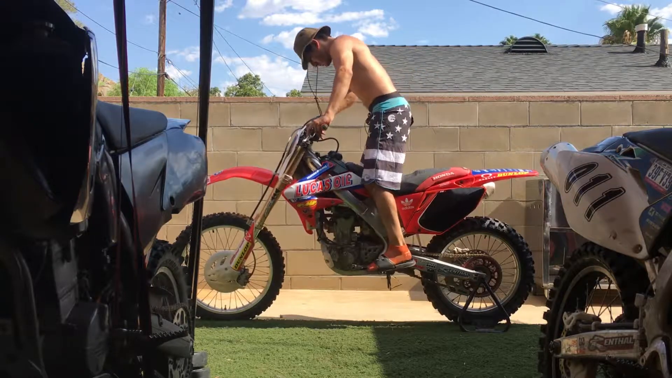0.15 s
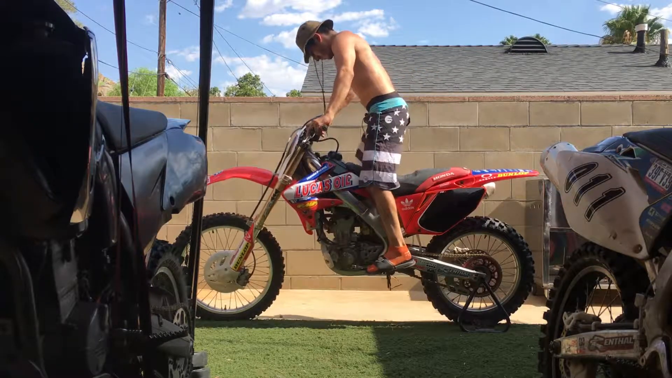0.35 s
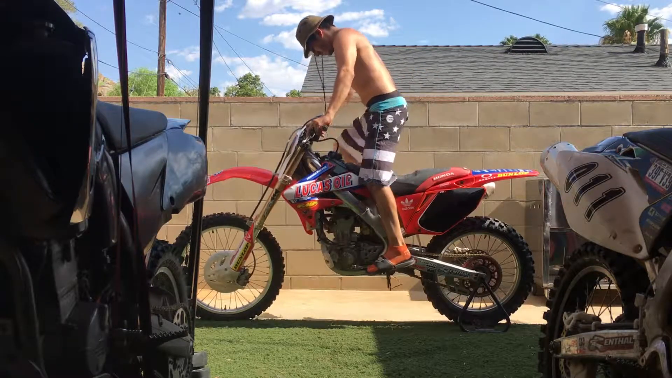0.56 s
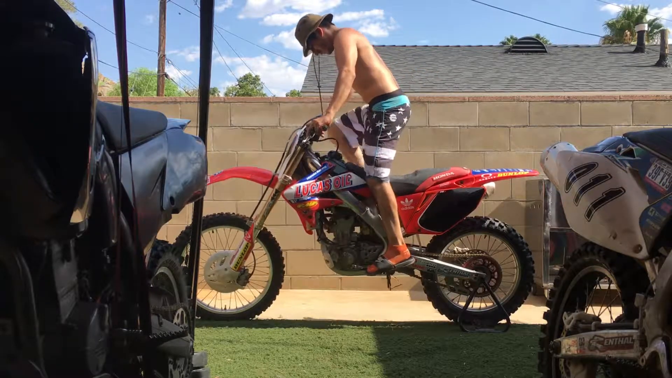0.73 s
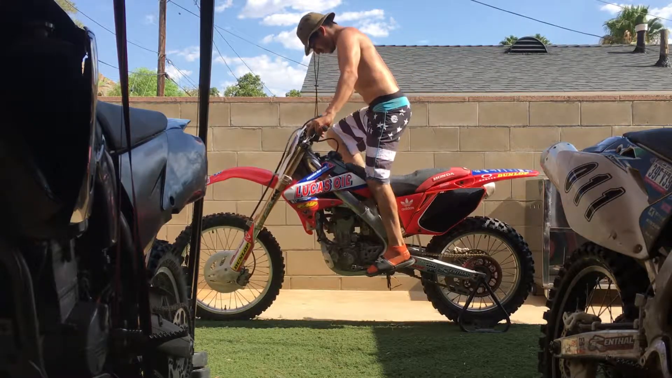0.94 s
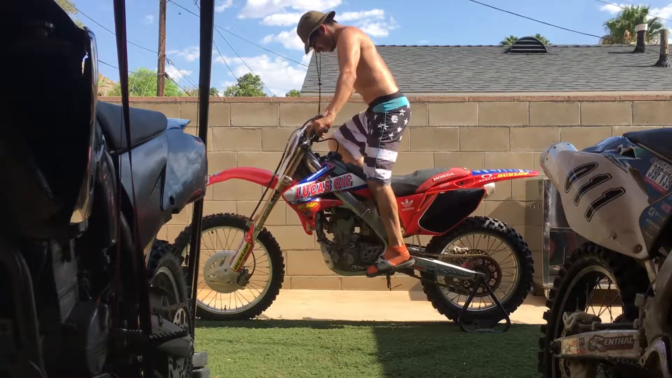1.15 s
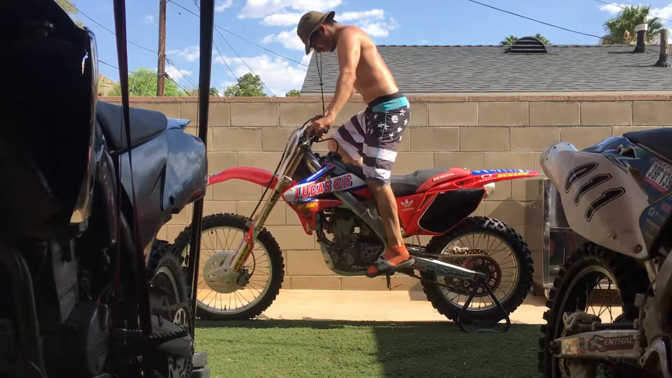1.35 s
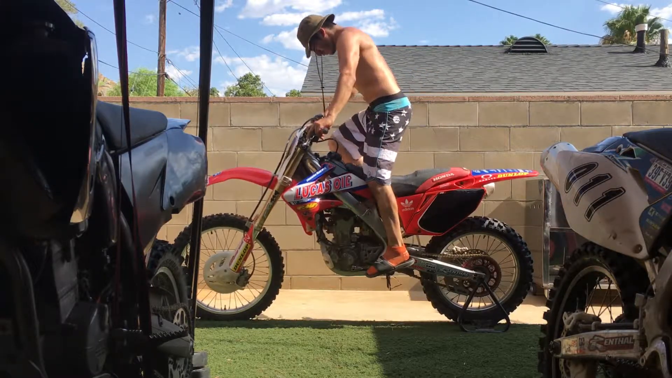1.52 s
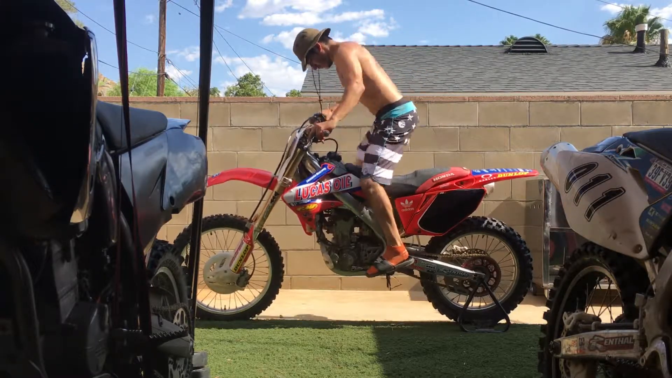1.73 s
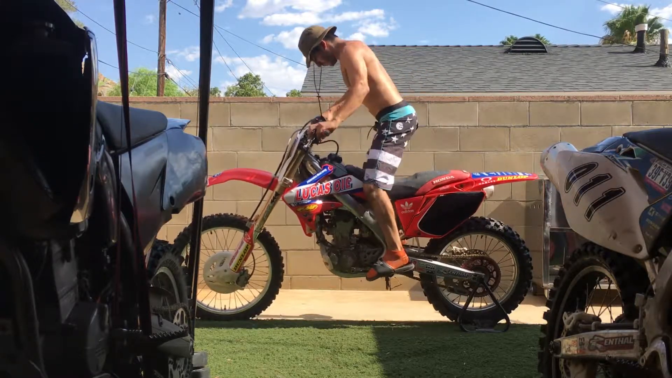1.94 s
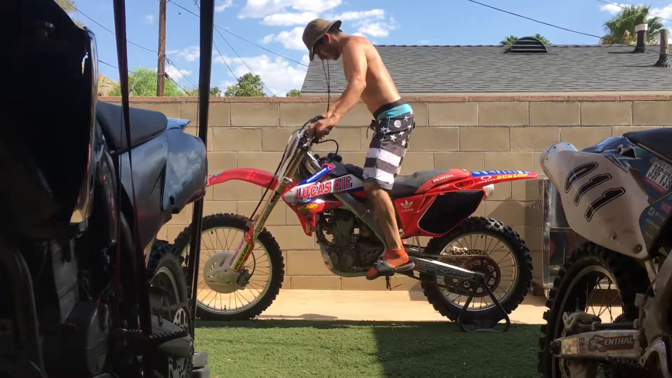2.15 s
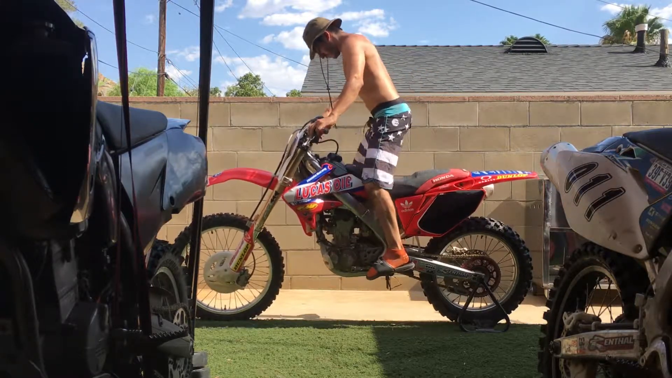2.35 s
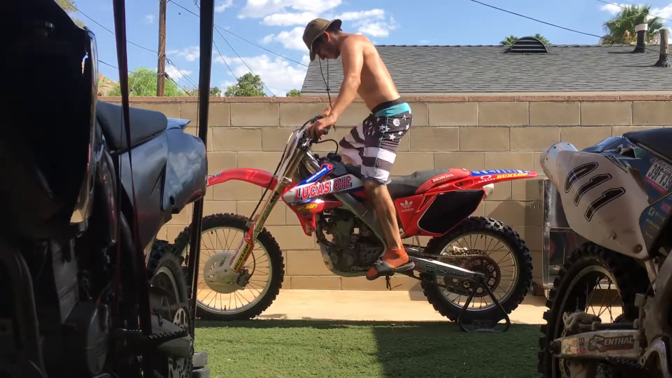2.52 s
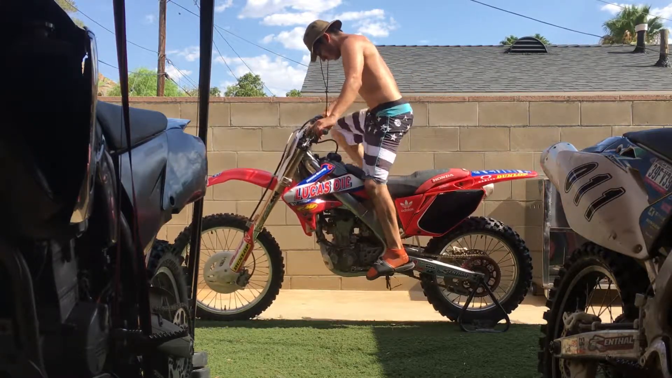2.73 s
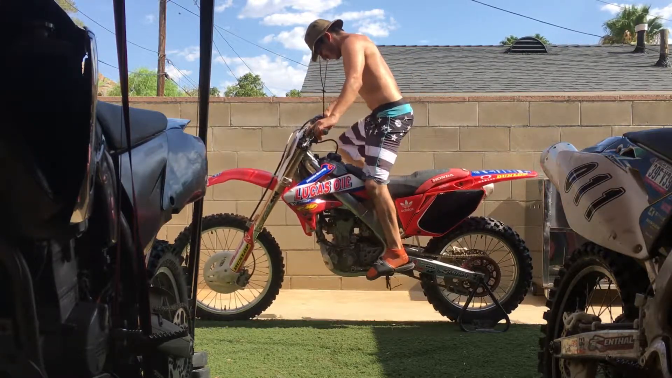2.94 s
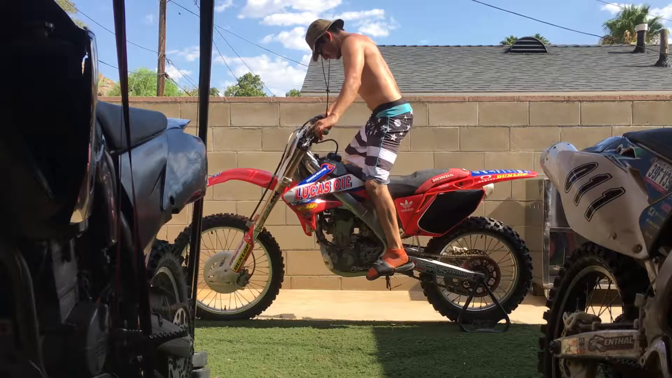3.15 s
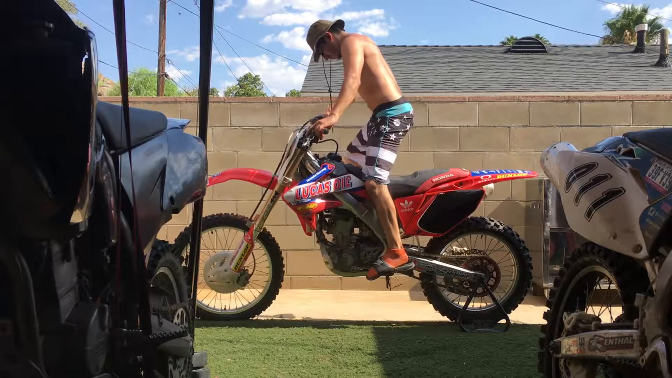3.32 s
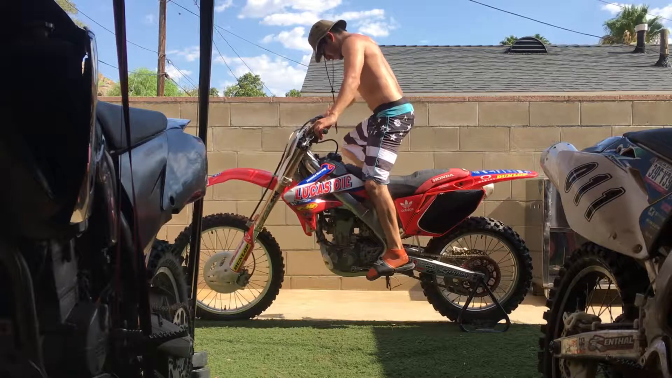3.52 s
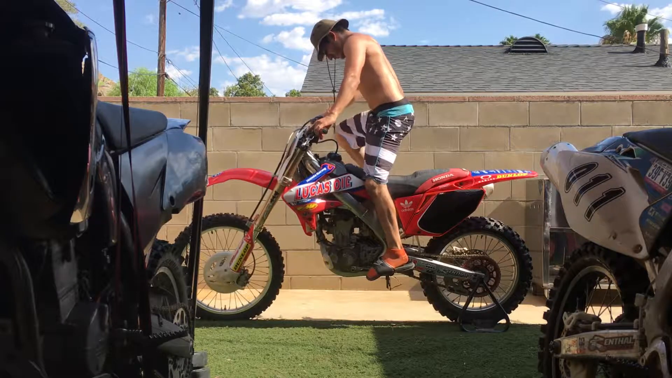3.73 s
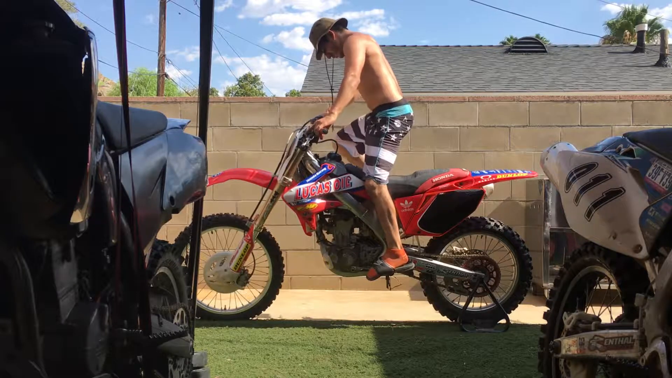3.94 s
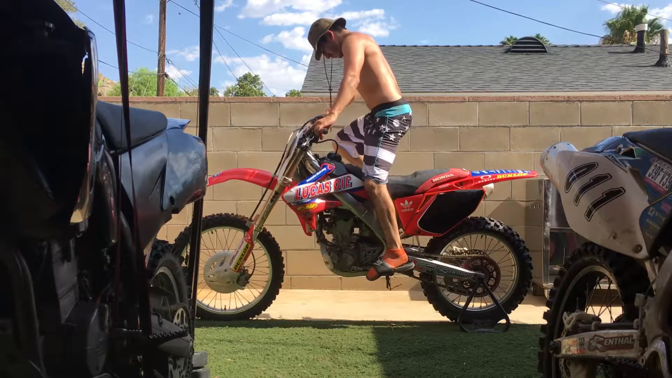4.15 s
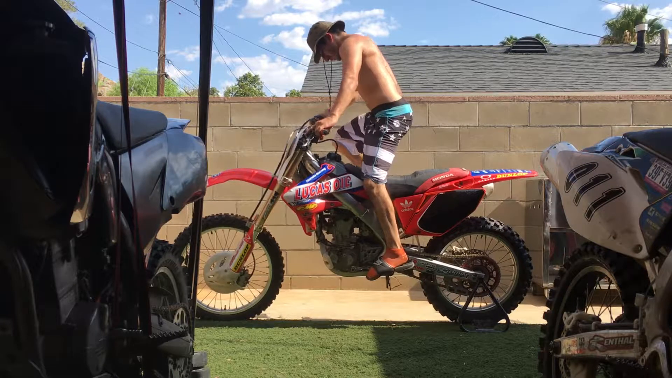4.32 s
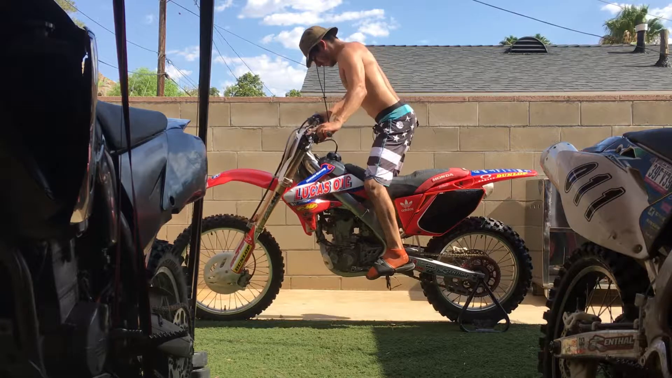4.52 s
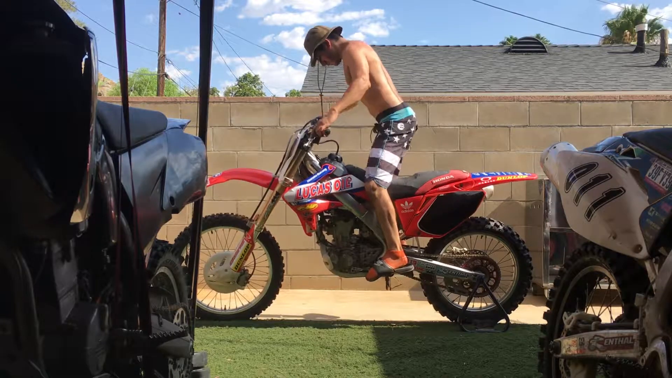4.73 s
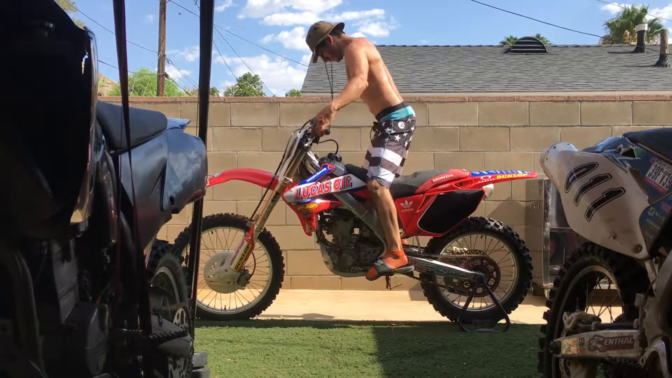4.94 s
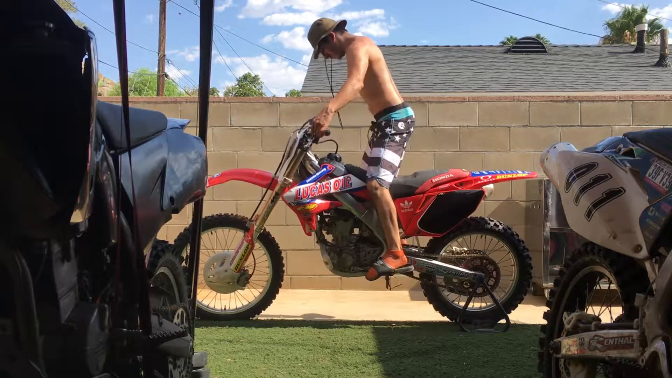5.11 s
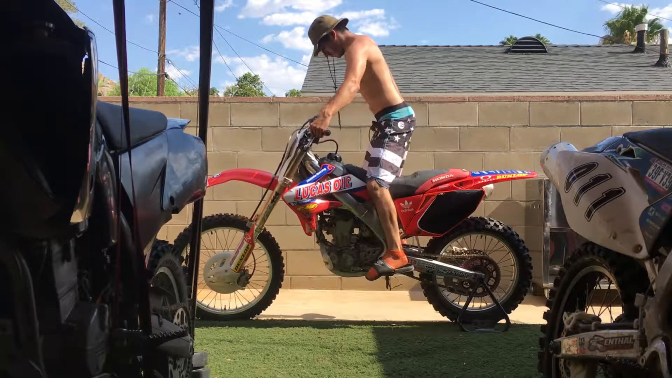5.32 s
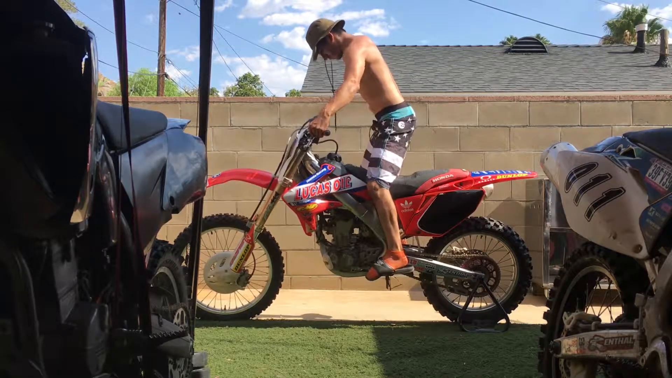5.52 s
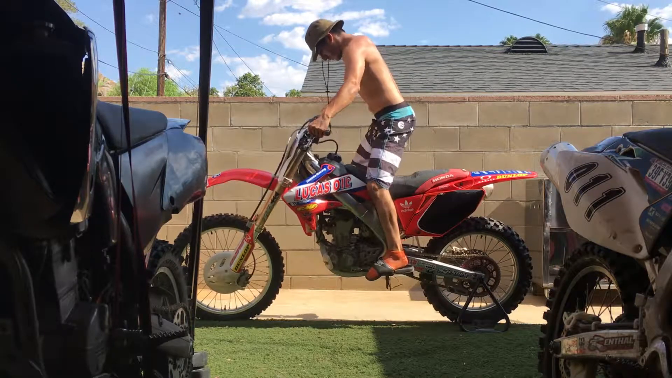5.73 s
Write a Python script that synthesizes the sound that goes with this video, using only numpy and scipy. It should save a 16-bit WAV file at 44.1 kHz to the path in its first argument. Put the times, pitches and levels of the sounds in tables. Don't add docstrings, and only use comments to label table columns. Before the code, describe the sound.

A quiet walled backyard with faint low town rumble, traffic wash, a distant unsteady fan hum and light microphone hiss. From 0 to 1.2 seconds, soft boot scuffs and dull plastic knocks on a dirt bike. At about 1.65 a firm hollow panel knock leads into the first kick: at 1.75 to 1.95 steel gears whirr, air rushes through the intake, the lever bangs on its stop near 1.82, and two deep exhaust thumps land about a tenth of a second apart. It dies quickly with a short wall echo. Small knocks follow, then seven bright ratchet clicks from 2.4 to 2.7. Light scuffs continue, with two more clicks around 3.6. A small rattle near 4.4 precedes the second kick at 4.5 to 4.7, similar and slightly stronger. The engine does not fire. One click at 4.8, a faint scuff near 5.1, and three last clicks from 5.7 to 5.85.

```python
import sys
import numpy as np
from scipy import signal
from scipy.fft import rfft, irfft, next_fast_len
from scipy.io import wavfile
from scipy.ndimage import uniform_filter1d, map_coordinates

SR = 44100
rng = np.random.default_rng(int(sys.argv[2]) if len(sys.argv) > 2 else 0)


def put_to_file(sound):
    columns = np.atleast_2d(sound).T
    safe = np.clip(columns, -1, 1)
    whole_steps = np.round(safe * 32767)
    wavfile.write(sys.argv[1], SR, whole_steps.astype(np.int16))


def level_to_linear(level):
    exponent = np.asarray(level, float) / 20
    return 10 ** exponent


N = 258822

# pitch_hz, level_db (rms)
FAN_HUM = [(26.9, -55), (59.2, -55.5), (80.7, -59.5), (118.4, -64.5), (166.9, -67.5)]
# freq_hz, level_db (per Hz)
RUMBLE_COLOUR = [(8.8, -28.5), (15, 0.5), (87, -10.5), (162, -17), (210, -25.5), (250, -18.5), (320, -49.5),
                 (550, -120)]
TRAFFIC_COLOUR = [(88, -31), (150, -5.5), (195, -12), (237, -14), (341, -7.5), (429, -15), (466, -13),
                  (1800, -36.5), (2340, -62.5), (3960, -120)]
HISS_COLOUR = [(880, -34.5), (1500, -8), (1650, -1), (1820, -2.0), (2800, -1), (5240, -3), (15500, -3.5),
               (17000, -11.0)]
# time_s, swell_db
TOWN_SWELL = [(0, -0.5), (.8, 0), (1.5, -0.9), (2.3, 1.2), (2.9, 1.5), (3.5, -0.2), (4.3, -0.5), (5.1, 0.3),
              (5.87, 0.5)]
# peak_s, rumble_db
GROUND_SHAKES = [(1.8, -33.5), (4.55, -33.5)]
RUMBLE_DB, TRAFFIC_DB, HISS_DB = -50.5, -60.5, -70
SHAKE_RISE_DB_PER_S, SHAKE_FALL_DB_PER_S, SHAKE_WASH_DB = 350, 90, -23

# freq_hz, t60_s
WALL_DECAY = [(100, 0.21), (1000, 0.22), (12000, 0.17)]
# freq_hz, gain_db
MIC_RESPONSE = [(15780, 0), (16000, -22), (16900, -35), (17100, -70)]

# start_s, peak_db, body_db (relative), bright_db (relative), t60_s
SCUFFS = [(0.0204, -45.5, 5, -16, 0.16), (0.3772, -58.5, -8, -12, 0.27), (0.5745, -62, -9, 10, 0.16),
          (0.689, -54, 8, 1, 0.37), (0.7294, -57, 11, -6, 0.2), (0.8764, -50.5, 3, -16, 0.23),
          (0.9328, -55.5, -7, -16, 0.16), (1.0054, -47, 2.5, -9, 0.23), (1.0249, -47, 0, -10, 0.1),
          (1.1416, -54, -16, 6, 0.36), (1.6559, -25.5, 2, -21, 0.071), (1.6624, -29.5, -14, -21, 0.19),
          (2.1094, -54, 10, -4, 0.22), (2.2056, -54.5, 3, -11.5, 0.14), (2.3156, -49, 3, -26, 0.48),
          (2.9261, -42.5, -1.5, -13.5, 0.33), (2.9801, -44.5, -4, -13, 0.21), (3.1677, -52, 7, -10, 0.13),
          (3.5043, -56, -12.5, -16, 0.35), (3.7196, -40.5, -3, -11, 0.24), (3.8808, -57, -2, -9.5, 0.22),
          (3.927, -48.5, 3, -25, 0.18), (3.9755, -46, 2, -21, 0.22), (5.07, -53, 3, -22, .5)]
# start_s, peak_db, body_db (relative), bright_db (relative), t60_s
KICK_CONTACTS = [(1.7124, -39.5, 3, 6.5, .23), (1.7609, -21.5, -9, -10.5, .23), (1.8203, -16, -4, -11, .3),
                 (1.9194, -29, -10, -9, .14), (1.9574, -30.5, -25, -4, .11), (4.357, -44, -12, -5, .17),
                 (4.3979, -50, -13, -.6, .14), (4.4184, -41, 1, -16, .37), (4.5032, -20, -7.5, -8.5, .2),
                 (4.5675, -13.5, -9, -11, .25), (4.71, -39, -11, -2, .2), (4.7594, -55, -9, -7, .15),
                 (4.9114, -51, 5, -9, .6)]
# start_s, peak_db, body_db (relative), t60_s
RATCHET_CLICKS = [(2.3918, -33.5, -13, .25), (2.4368, -32, -11.5, 0.2), (2.4838, -34, -8.5, 0.17),
                  (2.5378, -35, -1, .15), (2.5908, -34, -7.5, 0.15), (2.6467, -32.5, -10.5, 0.31),
                  (2.7226, -37.5, 1.5, 0.24), (3.6065, -36.5, -6.5, 0.2), (3.6647, -34, -5.5, 0.2),
                  (4.8201, -32, -2.5, 0.21), (5.7062, -35, -4, .17), (5.7779, -35.5, -8.5, 0.2),
                  (5.8449, -36, -6, 0.29)]
RATCHET_BRIGHT_DB, BODY_DULLS = -1, 0.21
# start_s, level_db
PANEL_KNOCKS = [(1.657, -28.5)]
# start_s, level_db
PAWL_STOPS = [(2.647, -30), (3.665, -35.5)]

# pitch_hz, width_hz, lift_db
STEEL_BODY = [(2090, 270, 4.5), (2600, 180, 1.5), (3050, 160, 2.5), (3850, 140, 3), (5290, 180, 1.5),
              (5740, 260, 1), (8130, 490, 4.5), (10700, 770, 6), (13100, 500, 6)]
PANEL_BODY = [(1119, 250, 4.5), (2300, 450, 4), (3900, 270, 0)]

# pitch_hz, under_db (relative to the contact), t60_s
CASE_MODES = [(2107, -13, .14), (3060, -16.5, .12), (4000, -19, 0.12), (5040, -21, 0.18), (5650, -15, .14),
              (7800, -12.5, 0.2), (8230, -21, .15), (8300, -9.5, 0.03), (10600, -18, .16),
              (12200, -17, 0.18)]
PAWL_MODES = [(2140, -15.5, 0.078), (2600, -22.5, 0.21), (3035, -25.5, 0.23), (3990, -22, 0.21),
              (5260, -21, 0.2), (5920, -23, 0.3), (8630, -19.5, 0.22), (10700, -22, 0.089),
              (12300, -17.5, 0.11)]
PANEL_MODES = [(1152, 1.5, 0.13), (2050, -11.5, .08), (2300, -8, .12), (3270, -13, 0.16), (4680, -31, .18),
               (5250, -17.5, .16), (8100, -23, .13)]
PEG_MODES = [(2266, -20.5, 0.12), (3780, -30, 0.2)]
STOP_MODES = [(1684, -12, 0.072), (5300, -15.5, 0.15), (9600, -9, 0.14), (13800, -4, .08), (15000, -5, .08)]
TAKE_UP_MODES = [(8470, -10, .19), (10640, -22, .18)]
LEVER_MODES = [(1050, -8, 0.07), (2624, -8, .13), (2990, -8, 0.081), (3790, -16.5, .16)]

# (start_s, level_db)
HOLLOW_NOTES = [
    (347, 0.057, [(.03, -49), (.385, -49), (.88, -46), (1.02, -45), (1.657, -22), (1.69, -44), (1.82, -24.5), (4.568, -23)]),
    (365, 0.19, [(2.728, -39.5), (2.77, -40), (3.74, -47.5), (4.82, -46)]),
    (296.4, .11, [(1.85, -25.5), (2.74, -40), (2.995, -42), (3.98, -46), (4.425, -42.5), (4.49, -25.5), (5.72, -47.5), (5.79, -49)]),
    (124, 0.23, [(1.935, -27.5), (2.1, -40.5), (2.26, -45), (4.82, -37)]),
    (567, .1, [(1.73, -34.5), (1.75, -38), (4.465, -37), (4.485, -34)]),
    (468, 0.27, [(1.66, -35.5)]),
    (2420, 0.13, [(1.02, -63), (4.83, -49), (5.72, -56), (5.79, -59)]),
    (722, 0.073, [(.727, -52), (4.419, -47.5)]),
    (2650, 0.09, [(2.872, -62)]),
    (3260, .07, [(3.167, -58.5), (3.185, -62), (3.205, -67), (4.445, -53), (4.465, -50)]),
]
# start_s, level_db, pitch_hz
SPRING_TICKS = [(1.6335, -46, 6500), (4.357, -42, 5800), (4.398, -42, 6500), (3.881, -52, 4000)]

# peak_s, whirr_db, rush_db, t60_s
CRANK_JOLTS = [
    (1.716, -46.5, -52, 0.72),
    (1.762, -28, -27, 0.086),
    (1.821, -21, -33, 0.097),
    (1.859, -25, -29.5, 0.27),
    (4.421, -53, -53.5, .6),
    (4.505, -29, -24.5, 0.082),
    (4.569, -20, -24, 0.12),
    (4.607, -25.5, -28.5, 0.31),
]
WHIRR_RISE_DB_PER_S, RUSH_RISE_DB_PER_S = 4001, 700
# freq_hz, level_db (per Hz)
WHIRR_COLOUR = [(590, -32), (1000, -1), (1290, -5.5), (2130, -7.5), (2740, -3), (5630, -0.5), (6330, -5),
                (7880, -2), (10900, -5.5), (16000, -9)]
# pitch_hz, width_hz, level_db
INTAKE_MODES = [(204.3, 15, -2.5), (351, 45, -1), (559, 20, -4.5), (704, 68, -14)]

# start_s, level_db, pitch_factor, deep_db (relative)
EXHAUST_STROKES = [(1.7591, -16, 1.02, -4), (1.859, -14.5, 1.02, -2.5), (4.5004, -15, 0.99, -4),
                   (4.604, -13, 1, -4.5)]
# pitch_hz, level_db, t60_s
PIPE_MODES = [(42.8, -7, 0.32), (67.1, -10, 0.37), (97.4, -9.5, 0.19), (128.8, 3, 0.19), (278.4, -7, 0.075),
              (346, -21.5, 0.13), (562.6, -19, 0.14), (712, -25, 0.15)]
# start_s, level_db, pitch_hz
PISTON_PUFFS = [(1.8055, -17, 55), (1.9195, -17, 60), (4.551, -18, 60), (4.663, -19, 60)]


def unit(x):
    return x / np.sqrt(np.mean(x ** 2) + 1e-20)


def along(points, hz):
    f, v = np.transpose(points)
    return np.interp(np.log(hz + 1), np.log(f + 1), v)


def wobble(rate):
    knots = rng.standard_normal(int(N * rate / SR) + 4)
    return map_coordinates(knots, [np.arange(N) * rate / SR])


def noise(gain, size):
    m = next_fast_len(size)
    spectrum = rfft(rng.standard_normal(m)) * gain(np.fft.rfftfreq(m, 1 / SR))
    return unit(irfft(spectrum, m)[:size])


def add(track, s, sound):
    part = track[round(s * SR):][:len(sound)]
    part += sound[:len(part)]


def jolt(s, db, rise_db_per_s, fall_db_per_s):
    late = np.arange(N) / SR - s
    return level_to_linear(db + np.where(late < 0, rise_db_per_s * late, -fall_db_per_s * late))


def lifted(modes, hz):
    return sum(db / (1 + ((hz - c) / (w / 2)) ** 2) for c, w, db in modes)


def yard():
    t = np.arange(N) / SR
    swell = level_to_linear(np.interp(t, *np.transpose(TOWN_SWELL)))
    shake = sum(jolt(s, db, SHAKE_RISE_DB_PER_S, SHAKE_FALL_DB_PER_S) for s, db in GROUND_SHAKES)
    fan = np.zeros(N)
    for hz, db in FAN_HUM:
        strength = level_to_linear(db + 3 + 3.4 * wobble(6.2))
        fan += strength * np.sin(2 * np.pi * hz * t + 1.28 * wobble(6))
    rumble = level_to_linear(-2.5) * noise(lambda hz: level_to_linear(along(RUMBLE_COLOUR, hz)), size=N)
    low = (level_to_linear(RUMBLE_DB) * swell + shake) * (rumble + unit(fan) * level_to_linear(-1.5))
    wash_gain = level_to_linear(TRAFFIC_DB) * swell + level_to_linear(SHAKE_WASH_DB) * shake
    wash_gain = wash_gain * level_to_linear(1.8 * wobble(13) + 1.1 * wobble(2.8))
    traffic = wash_gain * noise(lambda hz: level_to_linear(along(TRAFFIC_COLOUR, hz)), size=N)
    hiss = level_to_linear(HISS_DB + .5 * wobble(7)) * noise(lambda hz: level_to_linear(along(HISS_COLOUR, hz)), size=N)
    return low + traffic + hiss


def walls(x):
    hz, t, z = signal.stft(rng.standard_normal(SR // 2), SR, nperseg=256)
    fade = level_to_linear(-60 * t / along(WALL_DECAY, hz)[:, None])
    tail = signal.istft(z * fade, SR, nperseg=256)[1]
    return signal.fftconvolve(np.pad(x, (350, 0)), tail / np.linalg.norm(tail))[:N]


def contacts(events, modes, crack_db, crack_s, rise_s, edge_hz, snap_db):
    out, t = np.zeros(N), np.arange(16384) / SR
    for s, db, body_db, bright_db, t60 in events:
        body_db = np.clip(body_db, -11, 3)
        colour = [(edge_hz / 3, body_db - 13.5), (edge_hz, body_db + 13), (1350, 0.74 * body_db + 2),
                  (1800, 1.5), (5000, -.5), (11000, bright_db + 0.5), (17000, bright_db - 10.5)]
        stirred = [(c, w, lift * (1 + .5 * rng.standard_normal())) for c, w, lift in modes]
        rattle = noise(lambda hz: level_to_linear(along(colour, hz) + lifted(stirred, hz)), size=len(t))
        fade = level_to_linear(-60 * t / abs(t60)) + level_to_linear(crack_db - 60 * t / crack_s)
        snap_fade = level_to_linear(db + bright_db + snap_db - 60 * t / 0.0035)
        snap = snap_fade * np.diff(rng.standard_normal(len(t) + 1))
        add(out, s, snap + level_to_linear(db - 10.5) * rattle * fade * (1 - np.exp(-t / rise_s)))
    return out


def boots():
    return contacts(SCUFFS, PANEL_BODY, crack_db=-1.5, crack_s=0.02, rise_s=0.001487, edge_hz=488, snap_db=-3)


def hollow_parts():
    out, t = np.zeros(N), np.arange(SR // 3) / SR
    for hz, t60, hits in HOLLOW_NOTES:
        for s, db in hits:
            drift = hz / 40000 * np.cumsum(rng.standard_normal(len(t)))
            note = np.sin(2 * np.pi * hz * t + drift)
            add(out, s, level_to_linear(db - 60 * t / t60) * note * (1 - np.exp(-t / .002)))
    for s, db, hz in SPRING_TICKS:
        drift = 1.5 * np.cumsum(rng.standard_normal(len(t))) / 4
        add(out, s, level_to_linear(db - 60 * t / .006) * np.sin(2 * np.pi * hz * t + drift))
    return out * level_to_linear(1.5 * wobble(60))


def ringing(events, modes, scatter_db=3, tight=1):
    out, t = np.zeros(N), np.arange(SR // 6) / SR
    for s, db, *_ in events:
        for hz, under_db, t60 in modes:
            spread, phase = rng.standard_normal(14), rng.uniform(0, 2 * np.pi, 14)
            pitches = hz + tight * (45 + .028 * hz) * (spread - spread.mean())
            angle = 2 * np.pi * (pitches * t[:, None]).astype(np.float32)
            cluster = np.sin(angle + phase.astype(np.float32)).sum(axis=1)
            level_db = db + under_db + scatter_db * rng.standard_normal()
            fade = level_to_linear(level_db - 10.5 - 60 * t / abs(t60))
            add(out, s, fade * cluster * (1 - np.exp(-t / 0.00076)))
    return out


def metal_rings():
    dull_scuffs = [row for row in SCUFFS if row[3] < -8]
    rings = ringing(CRANK_JOLTS, CASE_MODES) + ringing(RATCHET_CLICKS, PAWL_MODES)
    rings += ringing(dull_scuffs, PEG_MODES)
    rings += ringing(CRANK_JOLTS[2::4], LEVER_MODES, scatter_db=0)
    rings += ringing(PANEL_KNOCKS, PANEL_MODES, scatter_db=0, tight=.6)
    rings += ringing(PAWL_STOPS, STOP_MODES, scatter_db=0)
    return rings + ringing(KICK_CONTACTS[:1], TAKE_UP_MODES, scatter_db=0)


def lever():
    clicks = []
    for s, db, body_db, t60 in RATCHET_CLICKS:
        bright_db = RATCHET_BRIGHT_DB - BODY_DULLS * (body_db + 7.5)
        clicks.append((s, db, body_db, bright_db, t60))
    return contacts(list(KICK_CONTACTS) + clicks, STEEL_BODY, crack_db=-2.5, crack_s=0.0064,
                    rise_s=0.00019, edge_hz=634, snap_db=2.5)


def intake(f):
    total = 0
    for k, (c, w, db) in enumerate(INTAKE_MODES):
        total = total + (-1) ** k * level_to_linear(db) * 1j * f * w / (c * c - f * f + 1j * f * w)
    return total


def crank():
    cases = noise(lambda hz: level_to_linear(along(WHIRR_COLOUR, hz) + .9 * lifted(STEEL_BODY, hz)), size=N)
    teeth = unit(level_to_linear(2.5 * wobble(400) + 1.2 * wobble(70)) * cases)
    whirr = sum(jolt(s, db, WHIRR_RISE_DB_PER_S, 60 / abs(t60)) for s, db, _, t60 in CRANK_JOLTS)
    rush = sum(jolt(s, db, RUSH_RISE_DB_PER_S, 60 / abs(t60)) for s, _, db, t60 in CRANK_JOLTS)
    whirr = np.maximum(whirr, np.roll(whirr, shift=330))
    rush = uniform_filter1d(rush, size=500)
    return level_to_linear(-4) * whirr * teeth + level_to_linear(-3) * rush * noise(intake, size=N)


def exhaust():
    out, t = np.zeros(N), np.arange(SR // 2) / SR
    for s, db, pitch, deep_db in EXHAUST_STROKES:
        warped = pitch * (.9 * t + 0.0046 * (1 - np.exp(-t / 0.042)))
        thump = np.zeros(len(t))
        for hz, level, t60 in PIPE_MODES:
            fade = level_to_linear(level + deep_db * (hz < 90) - 60 * t / t60)
            thump += fade * np.sin(2 * np.pi * hz * warped)
        add(out, s, -level_to_linear(db) * thump * (1 - np.exp(-t / .0028)))
    for s, db, hz in PISTON_PUFFS:
        add(out, s, level_to_linear(db - 60 * t / .06) * np.sin(2 * np.pi * hz * t))
    return out


def scene():
    bike = boots() + hollow_parts() + metal_rings() + lever() + crank()
    return (yard() + level_to_linear(-11) * walls(bike) + bike + exhaust())[None]


def top_cut(x):
    return signal.sosfilt(signal.butter(12, 16970, fs=SR, output="sos"), x)


def record(dry):
    m = next_fast_len(N)
    response = level_to_linear(along(MIC_RESPONSE, np.fft.rfftfreq(m, 1 / SR)))
    heard = irfft(rfft(dry, m) * response, m)[:, :N]
    return top_cut(heard)


dry = scene()
out = record(dry)
put_to_file(out)
```